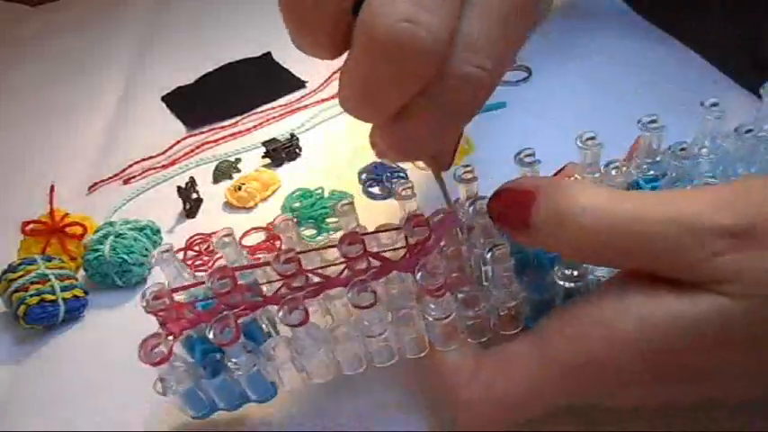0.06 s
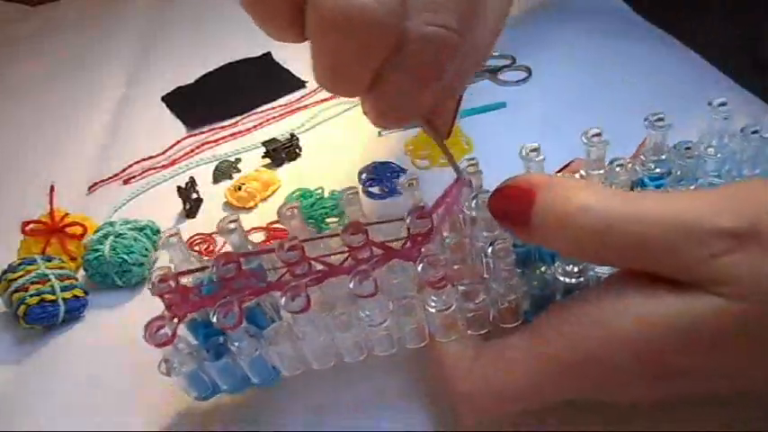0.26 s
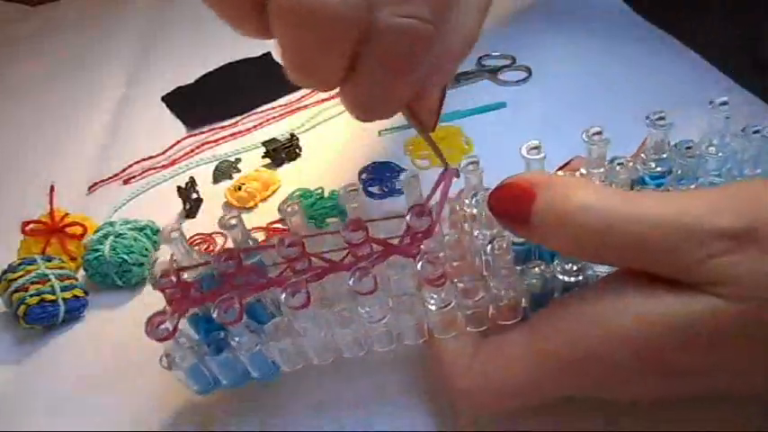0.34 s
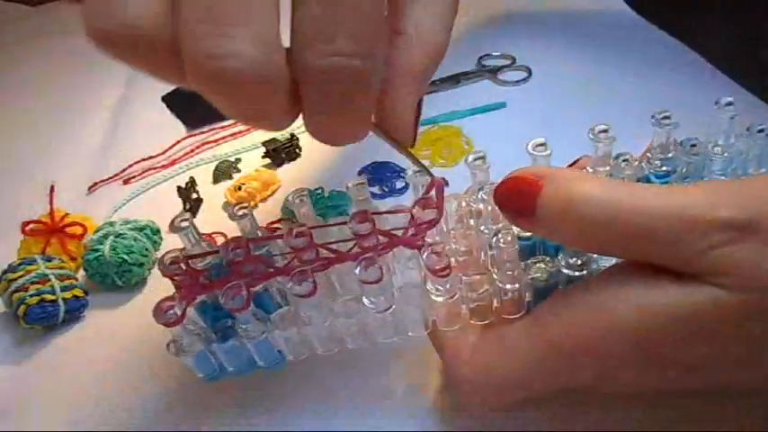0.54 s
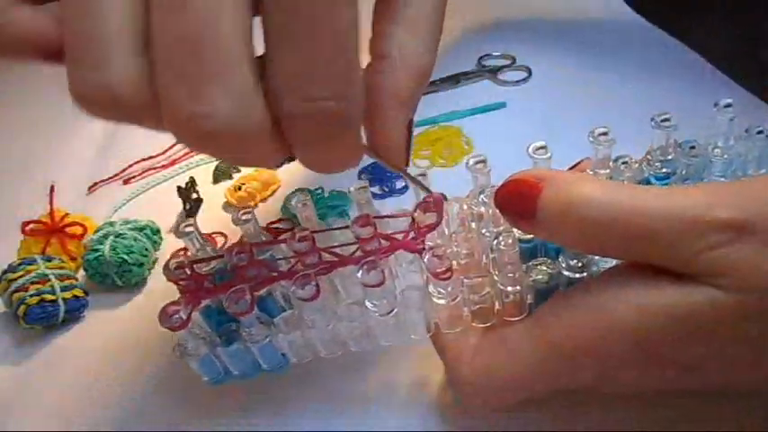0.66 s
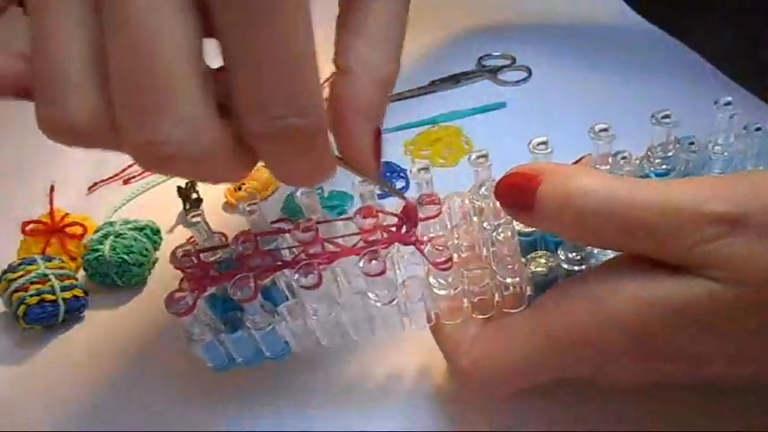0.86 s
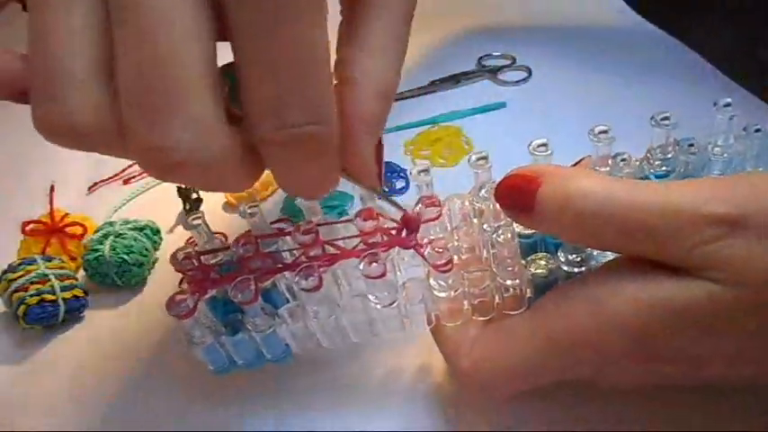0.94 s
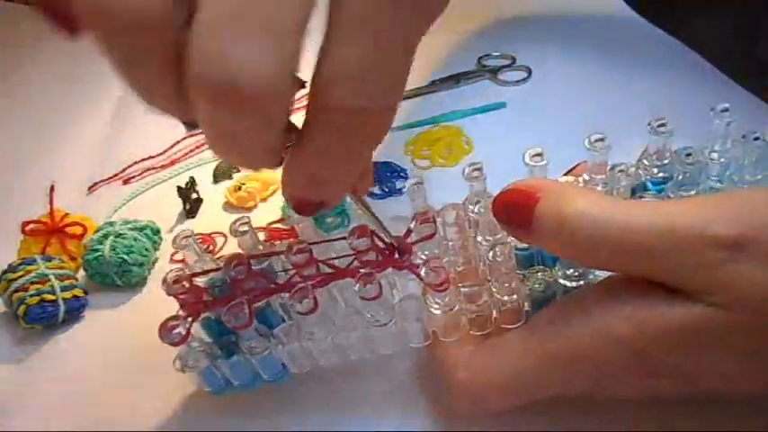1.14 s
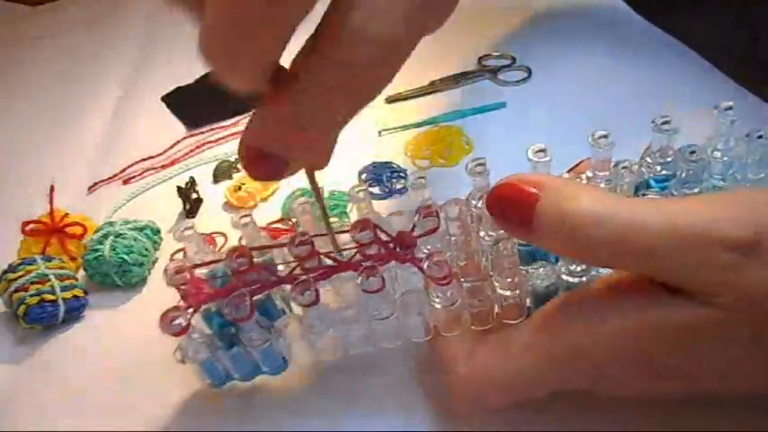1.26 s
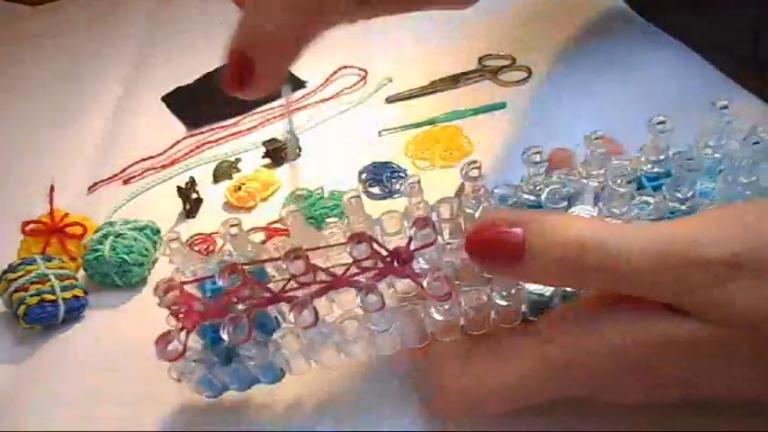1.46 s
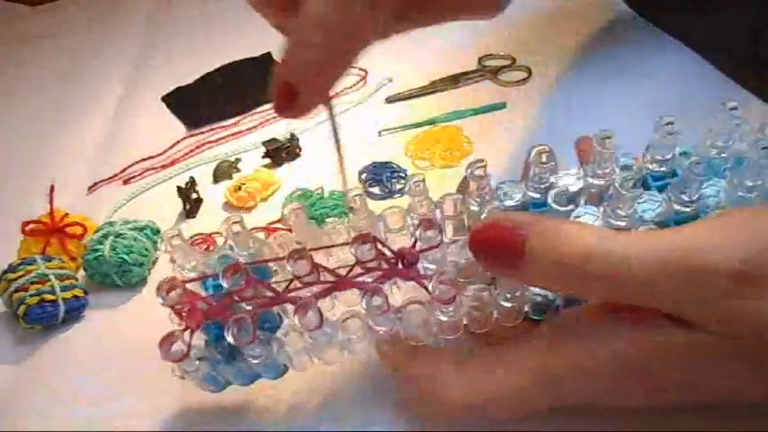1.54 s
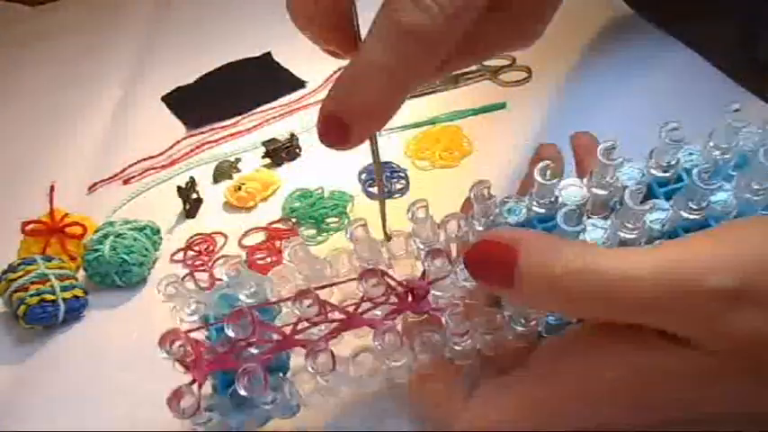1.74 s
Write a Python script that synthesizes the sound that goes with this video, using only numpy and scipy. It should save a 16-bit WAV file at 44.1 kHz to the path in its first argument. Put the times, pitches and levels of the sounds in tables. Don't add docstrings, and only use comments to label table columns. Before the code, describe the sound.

A metal hook clicks and snaps rubber bands over hard plastic loom pegs, close up

```python
import sys
import numpy as np
from scipy import signal
from scipy.fft import rfft, irfft, next_fast_len
from scipy.io import wavfile
from scipy.ndimage import uniform_filter1d

SR = 44100
rng = np.random.default_rng(int(sys.argv[2]) if len(sys.argv) > 2 else 0)


def invert_db(x):
    u = np.asarray(x, float) / 20
    return 10 ** u


def unload_audio(sound):
    columns = np.transpose(np.atleast_2d(sound))
    steps = np.round(np.clip(columns, -1, 1) * 32767)
    wavfile.write(sys.argv[1], SR, steps.astype(np.int16))


N = 77175


def hook():
    return snaps() + slips() + thuds()


# [t/s, peak level/dB, peg f/Hz, brightness level/dB,
# chatter decay/ms]
SNAPS = [(0.0637, -35, 2800, -33, 3.1), (0.0826, -26.5, 1950, -17.5, 1.9),
         (0.1839, -28.5, 2200, -16.5, 3.1), (0.2594, -18.5, 4300, -12.5, 2.9),
         (0.3063, -17.5, 2110, -2, 1.65), (0.3581, -16, 7160, 5.5, 3.3), (0.4062, -21.5, 2940, -18.5, 2.9),
         (0.459, -8.5, 1750, -15.5, 2.7), (0.7012, -16.5, 3340, -4.5, 2.6), (0.847, -19, 1836, -10.5, 2.3),
         (0.8937, -4.5, 2060, -10.5, 2.9), (1.0009, -23, 2170, -14.5, 3.1), (1.142, -24, 1950, -15, 4.2),
         (1.3665, -16, 2165, -20, 2.9), (1.485, -25, 1940, -18, 1.9),
         (0.364, -14.5, 6600, 6.5, 1.2),
    (.828, -42, 6530, 13, 0.98),
    (0.854, -35, 1650, -37, 2.1),
    (1.0192, -17, 2916, -11.5, 1.8),
    (0.3573, -21.5, 2750, -18, 3),
    (1.3447, -34.5, 1950, -18, 9.3),
]


def snaps():
    return contacts(SNAPS, rise_s=0.0006, tick_db=7, trim_db=-0.2)


# [t/s, peak level/dB, peg f/Hz, brightness level/dB, chatter decay/ms]
SLIPS = [(0.1112, -32, 2110, -16, 2.7), (0.124, -39.5, 3330, -21, 3.6), (0.2076, -36, 1360, -25, 3.5),
         (0.215, -31.5, 1970, -20, 3.5), (0.2251, -36, 1800, -28, 7.1), (0.2423, -13.5, 1350, -14, 1.24),
         (0.2808, -19, 2160, -10.5, 3.2), (0.3333, -25, 2750, -17, 4.8), (0.3474, -22, 2820, -26, 2),
         (0.4219, -27.5, 2110, -22, 5.4), (0.4456, -20, 1790, -25, 6.9), (0.556, -8, 4950, -8.5, 2.57),
         (0.9368, -34.5, 2000, -32, 3.6), (1.0186, -21, 2940, -17, 1.1), (1.3458, -25.5, 1940, -21.5, 7.6),
         (1.3737, -18.5, 2410, -4.5, 3.3), (1.4771, -31, 1820, -28, 2.1), (1.5991, -19.5, 1950, -13.5, 4.5)]


def slips():
    return contacts(SLIPS, rise_s=0.00097, tick_db=-13, trim_db=-5.06)


def contacts(rows, rise_s, tick_db, trim_db):
    mix = np.zeros(N)
    lag_s = 0.0006
    for start, *blow in rows:
        sound = contact(*blow, rise_s, tick_db, trim_db)
        add(mix, start + lag_s, room(sound))
    return mix


# [f/Hz, level/dB]
CONTACT = [(180, -69), (300, -0.5), (751, -20.5), (1960, -5), (2320, -4), (2690, -2), (6840, -7),
           (8320, -12.5), (10900, -30.5), (14200, -69), (22000, -120)]


def contact(peak_db, peg_hz, bright_db, chatter_ms, rise_s, tick_db, trim_db):
    t = np.arange(2048) / SR
    force = flattened(chatter(t, peak_db, chatter_ms, rise_s, tick_db))
    sound = signal.fftconvolve(force, struck_body(t, peg_hz))[:len(t)]
    slope = 0.41 * (bright_db + 12.5)
    hump_db, hump_oct = 2.5, 0.46
    low_cut_hz, low_cut_db_per_oct = 1050, 22

    def gain_db(hz):
        tilt = slope * np.log2(np.clip(hz, 800, 9000) / 3000)
        hump = hump_db * np.exp(-(np.log2((hz + 1) / peg_hz) / hump_oct) ** 2)
        low_cut = low_cut_db_per_oct * np.log2(np.clip(hz / low_cut_hz, .1, 1))
        return read(CONTACT, hz) + tilt + hump + low_cut

    sound = colour(sound, gain_db)
    return invert_db(peak_db + trim_db) * sound / np.max(abs(sound))


def chatter(t, peak_db, chatter_ms, rise_s, tick_db):
    knocks_per_s, spread_db = 9000, 3.5
    hit, size, sign = rng.uniform(1e-3, 1, (3, len(t)))
    shape = (1 - np.exp(-t / rise_s)) * np.exp(-t / max(chatter_ms / 1000, 3e-4))
    strength = invert_db(-spread_db * np.log(size)) * np.sign(sign - .5)
    knocks = (hit < knocks_per_s / SR) * strength * shape
    knocks = knocks / np.linalg.norm(knocks)
    tick_per_db = 0.11
    knocks[round(rise_s * SR)] -= invert_db(tick_db + tick_per_db * (peak_db + 18)) / 4
    return knocks


def struck_body(t, peg_hz):
    loss_db_per_oct, loss_hz, cycles = 9, 2100, 34
    peg_db = -1 - loss_db_per_oct * max(np.log2(peg_hz / loss_hz), 0)
    body = invert_db(-5) * loom(t) + 4 * ring(t, peg_hz, peg_db, cycles / peg_hz)
    body[0] += invert_db(9)
    return body


# [f/Hz, level/dB, t60/s]
LOOM = [(1313, 7.5, 0.0074), (1750, -20, 0.024), (1940, -3.8, 0.0098), (2493, -18, 0.058), (2785, 1, 0.06),
        (3532, 1, 0.0065), (3940, -7, 0.0087), (4444, -3, 0.0076), (5214, 1.5, 0.048), (5844, -1, 0.045),
        (6600, 1.5, 0.013), (7540, -4.5, 0.004)]


def loom(t):
    detune, spread_db, longest_t60 = 0.02, 4, 0.022
    body = np.zeros(len(t))
    for hz, db, t60 in LOOM:
        pitch_shift, level_shift = rng.uniform(-1, 1, 2)
        body += ring(t, hz * (1 + detune * pitch_shift), db + spread_db * level_shift,
                     min(t60, longest_t60))
    return body / np.linalg.norm(body)


# [t/s, peak level/dB, f/Hz]
THUDS = [
    (.4605, -56, 700),
    (.849, -56, 534),
    (0.895, -55.5, 490),
    (1.368, -44, 490),
]


def thuds():
    mix, t = np.zeros(N), np.arange(4096) / SR
    t60, rise_s = 0.042, 0.002
    for start, db, hz in THUDS:
        envelope = invert_db(db - 60 * t / t60) * (1 - np.exp(-t / rise_s))
        add(mix, start, 2 * envelope * np.sin(2 * np.pi * hz * t))
    return mix


# [t/s, level/dB]
RUB = [(0, -50.5), (.1, -55.5), (.16, -70), (.3, -56.5), (.36, -40), (.42, -73), (.52, -57), (.62, -67),
       (.88, -66), (.93, -51), (.99, -56.5), (1.08, -63), (1.3, -69), (1.42, -63), (1.52, -60.5),
       (1.59, -48), (1.66, -54.5), (1.75, -54.5)]
# [f/Hz, level/dB]
RUB_COLOUR = [(350, -28), (600, -20.5), (1290, -13), (1580, -37), (1850, -9), (2330, -6), (4180, -7),
              (7220, -8), (10900, -44), (14200, -57), (22000, -120)]
# [f/Hz, level/dB, t60/s]
RUB_RINGS = [(1345, -11.5, 0.022), (1950, -7.5, 0.013), (3290, -15.5, 0.026), (4265, -11, 0.037)]


def rub():
    grains_per_s, spread_db = 8300, 1.5
    grains = (rng.random(N) < grains_per_s / SR) * invert_db(spread_db * rng.exponential(1, N))
    flutter = np.sqrt(uniform_filter1d(grains ** 2, size=60) + 1e-9)
    t = np.arange(2048) / SR
    body = 4 * sum(ring(t, *mode) for mode in RUB_RINGS)
    body[0] += 1
    rung = signal.fftconvolve(patchy(RUB_COLOUR, patch_db=1) * flutter, body)[:N]
    s, db = np.transpose(RUB)
    return invert_db(np.interp(np.arange(N) / SR, s, db)) * evened(rung)


# [t/s, level/dB]
ECHOES = [(.0012, -24.5), (.0031, -9.5), (.0055, -23), (.009, -29.5)]
# [f/Hz, level/dB]
ROOM_COLOUR = [(500, 11), (2000, 0.5), (4500, 2), (9000, 3)]


def room(x):
    t = np.arange(8192) / SR
    tail_db, t60, start_s = -15, 0.16, 0.003
    tail = rng.standard_normal(len(t)) * invert_db(-60 * t / t60) * (t > start_s)
    tail = colour(flattened(tail, size=40), lambda hz: read(ROOM_COLOUR, hz))
    response = invert_db(tail_db) * tail / np.linalg.norm(tail)
    response[0] = 1
    for s, db in ECHOES:
        response[round(s * SR)] += invert_db(db)
    return signal.fftconvolve(x, response)


# [f/Hz, level/dB]
HISS = [(12, -53), (20, -26.5), (265, -12.5), (703, -10.5), (939, -3), (1510, -8), (1860, -6), (5490, -15),
        (10900, -26.5), (14200, -75), (22000, -120)]


def room_tone():
    hz = np.fft.rfftfreq(N, 1 / SR)
    whirr_hz, whirr_width_hz = 955, 60
    white = rfft(rng.standard_normal((2, N)))
    hiss = evened(irfft(white[0] * invert_db(read(HISS, hz)), N))
    whirr = evened(irfft(white[1] / (1 + ((hz - whirr_hz) / whirr_width_hz) ** 2), N))
    return invert_db(-55.5) * hiss + invert_db(-71) * whirr


def ring(t, hz, db, t60):
    return invert_db(db - 60 * t / t60) * np.sin(2 * np.pi * hz * t) / np.sqrt(t60 * SR)


def patchy(points, patch_db):
    frames, hz = N // 128 + 5, np.fft.rfftfreq(512, 1 / SR)
    a, b, patches = rng.standard_normal((frames, 257, 3)).T
    patches = uniform_filter1d(patches, size=5, axis=0)
    patches = evened(uniform_filter1d(patches, size=12, axis=1))
    z = (a + 1j * b) * invert_db(read(points, hz)[:, None] + patch_db * patches)
    return evened(signal.istft(z, nperseg=512, noverlap=384)[1][:N])


def colour(x, gain_db):
    size = next_fast_len(2 * len(x))
    log_gain = np.log(invert_db(gain_db(abs(np.fft.fftfreq(size, 1 / SR)))))
    shape = np.exp(np.conj(signal.hilbert(log_gain)))[:size // 2 + 1]
    return irfft(rfft(x, size) * shape, size)[:len(x)]


def flattened(x, size=45):
    spectrum = rfft(x, 2 * len(x))
    smooth_power = uniform_filter1d(abs(spectrum) ** 2, size=size)
    return irfft(spectrum / np.sqrt(smooth_power + 1e-9))[:len(x)]


def read(points, hz):
    f, value = np.transpose(points)
    return np.interp(np.log(hz + 1), np.log(f + 1), value)


def evened(x):
    return x / np.sqrt(np.mean(x ** 2) + 1e-20)


def add(mix, s, sound):
    part = mix[round(s * SR):][:len(sound)]
    part += sound[:len(part)]


def scene():
    return (hook() + rub() + room_tone())[None]


def half_rate(dry):
    hz = np.fft.rfftfreq(N, 1 / SR)
    edge_hz, width_hz, hold = 10300, 330, 0.68
    roll_off = np.sqrt(1 + np.exp(np.minimum((hz - edge_hz) / width_hz * 4, 60)))
    limited = irfft(rfft(dry) / roll_off, N)
    kept = 2 * limited * (np.arange(N) % 2 == 0)
    return (kept + hold * np.roll(kept, 1, axis=1)) / (1 + hold)


def low_pass(x, edge_hz):
    taps = signal.firwin(511, edge_hz, window=("kaiser", 9), fs=SR)
    return signal.oaconvolve(x, taps[None], "same")


def gated_top(x):
    power = abs(uniform_filter1d(x ** 2, size=128)) + 1e-12
    earlier = np.roll(uniform_filter1d(power, size=512), 400, axis=1)
    sudden = power > invert_db(2 * 18) * earlier
    under = low_pass(x, 15750)
    top = low_pass((x - under) * uniform_filter1d(sudden * 1., size=128), 16750)
    return under + invert_db(-15) * top


def top_cut(x):
    return signal.sosfilt(signal.butter(12, 16960, fs=SR, output="sos"), x)


def record(dry):
    mix = gated_top(half_rate(dry))
    return top_cut(mix)


dry = scene()
out = record(dry)
unload_audio(out)
```